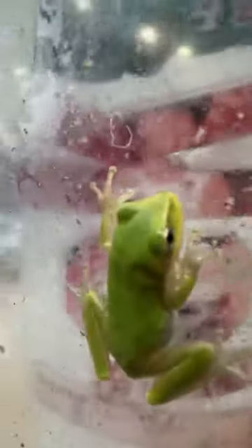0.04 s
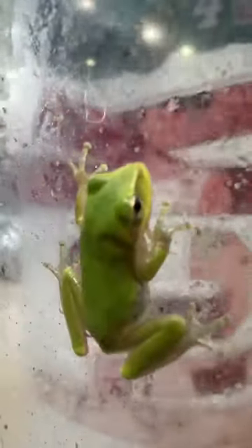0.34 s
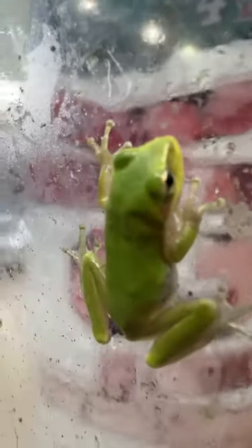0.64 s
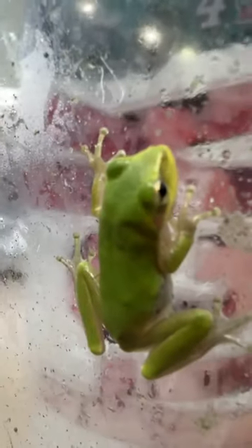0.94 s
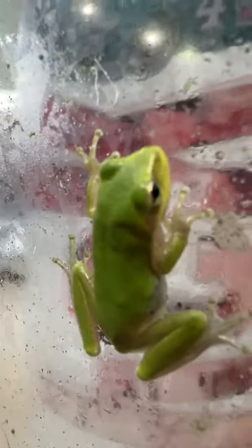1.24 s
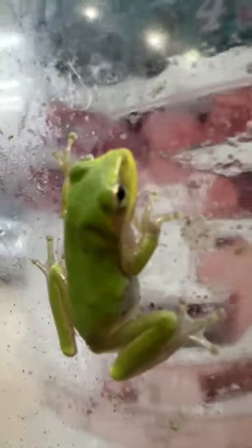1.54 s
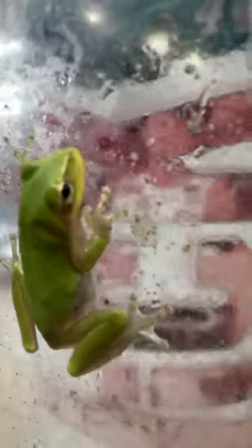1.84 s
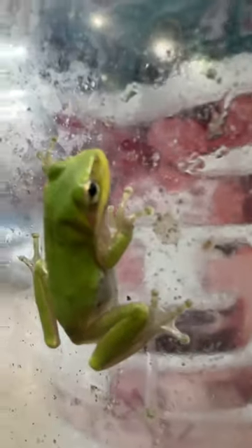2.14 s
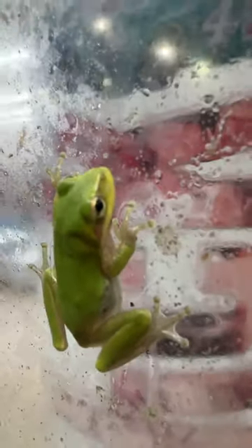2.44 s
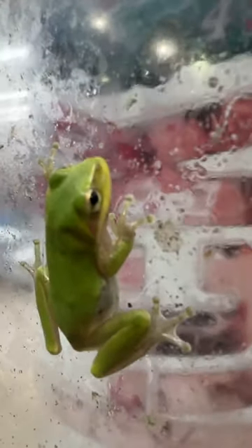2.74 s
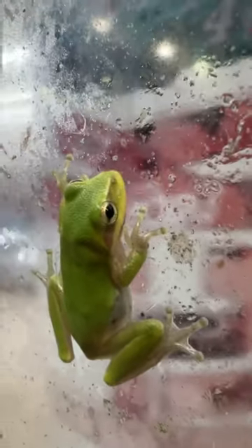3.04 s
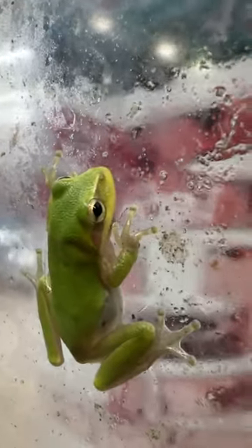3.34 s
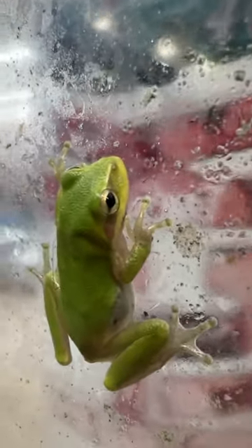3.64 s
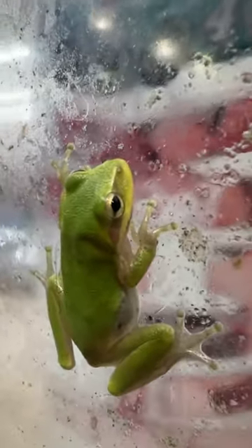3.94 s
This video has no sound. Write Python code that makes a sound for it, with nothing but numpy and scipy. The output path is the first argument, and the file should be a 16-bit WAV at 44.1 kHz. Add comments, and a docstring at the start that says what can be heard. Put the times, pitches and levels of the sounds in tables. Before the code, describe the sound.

Distant traffic rumbles steadily for four seconds outdoors at night, with a machinery hum and a faint, high shimmer of insects. A katydid gives quiet double rasps at about 0.5, 2.4 and 3.8 seconds, and a smaller one lisps from 0.6 to 0.9. An idling engine's low throb grows stronger from about 1.8 seconds. One small tick sounds nearby at 2.7, along with a faint high trill.

```python
"""A damp night outside a window

Distant traffic rumbles as broadband noise, an idling engine throbs on one low tone and machinery hums.
Insects call by stridulation: a scraper crosses a file of teeth, and the impulses ring the wing.
Far choruses merge into shimmering treble bands; a katydid rasps in pairs, a smaller one lisps
higher up, and something ticks once near the glass."""
import sys
import numpy as np
from scipy import signal
from scipy.fft import rfft, irfft
from scipy.io import wavfile
from scipy.ndimage import uniform_filter1d

SR = 44100
rng = np.random.default_rng(int(sys.argv[2]) if len(sys.argv) > 2 else 0)


def generate_wav(signal):
    """Clip the signal to [-1, 1] and save it as 16-bit WAV at the path in sys.argv[1]."""
    frames = np.transpose(np.atleast_2d(signal))
    scaled = np.clip(frames, -1, 1) * 32767
    pcm = np.round(scaled).astype(np.int16)
    wavfile.write(sys.argv[1], SR, pcm)


N = 176400

# Stereo balance of traffic and machinery (frequency [Hz], left minus right [dB])
BALANCE = [(60, 0), (110, 1.5), (180, 4.5), (700, 2.5), (1700, -2), (3000, .5), (6000, 0)]


def undb(db):
    """Amplitude ratio of a level in decibels."""
    return 10 ** (np.asarray(db) / 20)


def unit(x):
    """Normalisation to rms 1."""
    return x / np.sqrt(np.mean(x ** 2) + 1e-30)


def freqs():
    """Frequency of each Fourier bin, at least 1 Hz."""
    return np.maximum(np.arange(N // 2 + 1) * SR / N, 1)


def curve(points):
    """Interpolation of (frequency [Hz], value) points on a logarithmic frequency axis."""
    hz, value = np.array(points).T
    return np.interp(np.log(freqs()), np.log(hz), value)


def resonances(rows):
    """Frequency response of parallel resonances, each a Gaussian peak."""
    return sum(undb(db) * np.exp(-((freqs() - hz) / (2 * spread)) ** 2) for hz, spread, db in rows)


def colour(x, gain):
    """Filtering as multiplication of the spectrum."""
    return irfft(rfft(x) * gain, N)


def wander(rate_hz):
    """Smooth random modulation with a standard deviation near 1."""
    hold = max(int(SR / rate_hz), 2)
    steps = np.repeat(rng.standard_normal(N // hold + 2), hold)
    return 4 / 3 * uniform_filter1d(uniform_filter1d(steps, hold), hold)[:N]


def noise_pair(correlation):
    """Left and right noise spectra: the ratio of mid to side sets their correlation."""
    c = np.clip(correlation, -1, 1)
    mid, side = rfft(rng.standard_normal((2, N)))
    return mid * np.sqrt(1 + c) + side * np.sqrt(1 - c) * np.array([[1], [-1]])


def stereo_phase(rad):
    """Phase difference, shared equally between left and right."""
    return np.exp(.5j * rad * np.array([[1], [-1]]))


def stereo_balance():
    """Level difference per bin, shared equally between left and right."""
    return undb(curve(BALANCE) * np.array([[.5], [-.5]]))


def gate(start, length, fade_s):
    """Trapezoidal envelope: rise, hold and fall."""
    t = np.arange(N) / SR - start
    return np.clip(np.minimum(t, length + fade_s / 2 - t) / fade_s, 0, 1)


def tone(hz, drift=.003925):
    """Sinusoid of rms 1 with slight random frequency modulation."""
    cycles = np.cumsum(hz * (1 + drift * wander(5))) / SR
    return np.sqrt(2) * np.sin(2 * np.pi * (cycles + rng.random()))


def noise_band(hz, spread, phase, correlation):
    """Narrow-band stereo noise: white noise filtered by one resonance."""
    return irfft(noise_pair(correlation) * resonances([(hz, spread, 0)]) * stereo_phase(phase), N)


def traffic():
    """Incoherent sum of far vehicles: octave bands of noise swell together and flicker separately."""
    # Road noise (frequency [Hz], relative spectral density [dB])
    road_spectrum = [(20, -41.5), (30, -29), (48, -17), (100, -17.5), (165, -19), (200, -26.5),
                     (300, -29.5), (420, -34), (560, -33), (740, -30.5), (1050, -38), (1350, -43.5),
                     (1650, -46), (2000, -51.5), (2800, -50.5), (4000, -53), (5000, -55.5), (6200, -61),
                     (8200, -55.5), (9900, -59.5), (11000, -76)]
    # Likeness of left and right (frequency [Hz], correlation before clipping [ratio])
    correlation = [(60, .9995), (120, 0.979), (260, 0.95), (420, 0.21), (650, -0.48), (1100, -0.13),
                   (2000, 0.2), (2800, -0.58), (4000, 0.22), (5000, -0.59), (6000, 0.995), (7500, 0.79),
                   (10000, -1.2)]
    # Passing vehicles (time [s], spread [s], centre [Hz], width [octaves], lift [dB])
    passes = [(.25, .38, 940, 2.8, 2.5), (1.5, 0.35, 1050, 0.53, 0.5), (1.65, .4, 179, .7, 2.5),
              (2.25, .09, 197, 0.79, 5), (3.75, 0.36, 109, 0.87, 4)]
    spectrum = noise_pair(curve(correlation)) * undb(curve(road_spectrum)) * stereo_balance()
    t, octave = np.arange(N) / SR, np.log2(freqs() / 20)
    swell_db, out = .61 * wander(1.1), 0
    for k in range(10):
        band = irfft(spectrum * np.maximum(1 - abs(octave - k), 0), N)
        lift_db = sum(db * np.exp(-((t - time) / spread) ** 2 - ((k - np.log2(hz / 20)) / width) ** 2)
                      for time, spread, hz, width, db in passes)
        flicker_db = .5 * wander(7.07)
        out = out + band * undb(swell_db + lift_db + flicker_db)
    return unit(out) * undb(-41)


def machines():
    """Periodic motion gives line spectra: an idling engine's drone, wavering hum and one brief whine."""
    # Throb of the engine (time [s], relative level [dB])
    throb = [(0, -45), (.18, -39.5), (.5, -40), (0.851, -47), (1.44, -49.5), (1.85, -35.5), (2.04, -46),
             (2.17, -34), (2.37, -40.5), (2.52, -32), (2.8, -44.5), (2.95, -32), (3.1, -45.5),
             (3.28, -31.5), (3.42, -38), (3.55, -32.5), (3.66, -40), (3.88, -32.5), (4, -35)]
    # Machinery hum (frequency [Hz], level before balance [dB], waver [dB])
    hum_lines = [(58.3, -50, -2.5), (101.65, -51, 3), (108.95, -52, 10), (117.4, -46.5, -0.5),
                 (139.96, -53, 2), (175.9, -55, 3), (235.7, -59, 2.5), (293.5, -68.5, -0.5),
                 (317.3, -69, 1.5), (352.2, -64.5, 4), (357.5, -64.5, 4.5), (459.3, -68.5, 2),
                 (518.5, -69.5, 3.5), (723, -70.5, 7.5), (761, -68.5, 5), (794.9, -69, 5.5),
                 (1640, -86.5, 4)]
    throb_db = np.interp(np.arange(N) / SR, *np.array(throb).T)
    drone = tone(hz=54.2, drift=.0035) * undb(throb_db - .5)
    hum = sum(unit(tone(hz) * undb(waver * wander(3.97))) * undb(db) for hz, db, waver in hum_lines)
    whine = tone(hz=360.9) * undb(-50.5) * gate(start=3.16, length=.11, fade_s=.02)
    return colour(drone + hum + whine, stereo_balance())


def choruses():
    """Superposition: many far insects of each kind merge into a fluttering narrow band."""
    # Choruses (centre [Hz], spread [Hz], level [dB], flutter [dB], stereo phase [rad], coherence [0-1])
    kinds = [(4344, 190, -71, 3.5, 0.3, .6), (4960, 360, -71, 2, 3.5, 1), (7157, 193, -67, 1.5, 0.6, 0.98),
             (9360, 353, -67, 1.0, -1.566, 1)]
    out = 0
    for hz, spread, db, flutter, phase, coherence in kinds:
        band = noise_band(hz, spread, phase, coherence)
        envelope = undb(flutter * wander(70.7) + .06 * wander(4.227))
        out = out + undb(db) * unit(band * envelope)
    return out


def buzzes():
    """Rapid amplitude modulation of noise bands: faint, far trills that fade in and out."""
    # Trills (time [s], duration [s], level [dB], centre [Hz], spread [Hz], stereo phase [rad])
    trills = [(0.167, 0.23, -65.5, 3430, 900, 1), (.88, 0.18, -71, 4220, 300, 0.99),
              (1.503, 0.62, -69.5, 7130, 180, .5), (2.647, 0.46, -62.5, 8540, 960, -1.35),
              (3.86, .25, -61.5, 8200, 1100, -1.3)]
    out = 0
    for start, length, db, hz, spread, phase in trills:
        band = noise_band(hz, spread, phase, correlation=.94)
        flutter = undb(1.5 * wander(110))
        out = out + unit(band * flutter) * undb(db) * gate(start, length, fade_s=.13)
    return out


def far_chirps():
    """Resonance driven by scraping: single strokes of far insects, each at its own pitch."""
    # Wing strokes (time [s], duration [s], level [dB], pitch [Hz])
    strokes = [(0.032, 0.02, -61, 4200), (.158, .014, -62, 4500), (.252, .016, -65, 4380),
               (0.293, 0.027, -62, 4200), (0.63, 0.022, -65.5, 4520), (.973, 0.027, -64, 4050),
               (1.917, .012, -63, 4200), (1.956, .014, -61, 4340), (3.041, .025, -63.5, 3950)]
    scrape = noise_pair(.83) * stereo_phase(1.0)
    spread_hz, out = 190, 0
    for start, length, db, hz in strokes:
        ring = irfft(scrape * resonances([(hz, spread_hz, 0)]), N)
        out = out + unit(ring) * undb(db) * gate(start, length, fade_s=.0055)
    return out


def tick():
    """Impulse excitation: a point contact and a moment of crackle ring three damped modes."""
    # Modes of the tick (frequency [Hz], spread [Hz], relative gain [dB])
    modes = [(1850, 300, -5), (4250, 380, -6.5), (8100, 600, 0)]
    start_s, decay_s, peak_db = 2.6553, .0016, -35
    t = np.arange(N) / SR - start_s
    contact = np.diff((t >= 0) * 1., prepend=0)
    crackle = .18 * rng.standard_normal(N) * (t >= 0) * np.exp(-abs(t) / decay_s)
    ring = colour(contact + crackle, resonances(modes) * stereo_phase(-1.2))
    return undb(peak_db) * ring / abs(ring).max()


def stridulate(strokes, wing, tooth_hz, phase, echo_db, t60_s, scrape, fade_s):
    """Stridulation: tooth impacts ring the wing, retuned on each stroke; nearby walls reverberate."""
    teeth_passed = np.cumsum(tooth_hz * (1 + .14 * wander(300))) / SR
    impacts = np.diff(np.floor(teeth_passed), prepend=0)
    force = unit(impacts) + scrape * rng.standard_normal(N)
    call = 0
    for start, length, db, tuning in strokes:
        ring = colour(force, resonances([(hz * tuning, spread, gain) for hz, spread, gain in wing]))
        call = call + unit(ring) * undb(db) * gate(start, length, fade_s)
    t = np.arange(N) / SR
    tail = rng.standard_normal((2, N)) * np.exp(-np.log(1000) * t / t60_s)
    echo = signal.fftconvolve(call[None], unit(tail) / np.sqrt(N), axes=1)[:, :N]
    return colour(call, stereo_phase(phase)) + undb(echo_db) * echo


def small_katydid():
    """A smaller wing resonates higher; strong friction noise blurs its tooth impacts into a lisp."""
    # Wing strokes (time [s], duration [s], level [dB], wing tuning [ratio])
    strokes = [(.604, 0.025, -61.5, 0.96), (.660, .0405, -63.5, 0.99), (.725, .028, -60.5, 1),
               (.835, .035, -65, 0.99), (.895, .05, -69, 1)]
    # Wing resonances (frequency [Hz], spread [Hz], relative gain [dB])
    wing = [(8130, 480, -3), (9440, 350, -5)]
    return stridulate(strokes, wing, tooth_hz=690, phase=-1.2,
                      echo_db=3, t60_s=.53, scrape=1.0, fade_s=.0064)


def katydid():
    """Paired wing strokes rasp: a slow train of tooth impacts is heard as roughness."""
    # Wing strokes (time [s], duration [s], level [dB], wing tuning [ratio])
    strokes = [(.528, .0163, -53.8, 1.005), (.572, .0163, -54.5, 1.01), (2.367, .006, -54, .995),
               (2.399, .0175, -53.5, .975), (2.442, .0202, -53.3, .995), (3.769, .0141, -55.8, .97),
               (3.812, .0139, -54.3, 1.01)]
    # Wing resonances (frequency [Hz], spread [Hz], relative gain [dB])
    wing = [(3796, 300, -8.5), (4444, 135, 1.5), (4800, 150, -18)]
    # Left-right difference of the direct sound (frequency [Hz], phase [rad])
    phases = [(3600, 0.31), (4450, 1.7), (4900, 2.79)]
    return stridulate(strokes, wing, tooth_hz=411, phase=curve(phases),
                      echo_db=-4, t60_s=.19, scrape=.38, fade_s=.0024)


def scene():
    """Linear superposition: rumble and hum lie under the insects and the tick."""
    background = traffic() + machines() + choruses() + buzzes() + far_chirps()
    return background + tick() + small_katydid() + katydid()


def record(dry):
    """Band limiting: a steep elliptic low-pass filter removes the top of the treble."""
    cutoff_hz = 10400
    return signal.sosfilt(signal.ellip(10, .2, 80, cutoff_hz, fs=SR, output="sos"), dry)


dry = scene()
out = record(dry)
generate_wav(out)
```